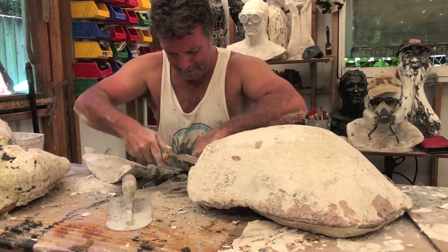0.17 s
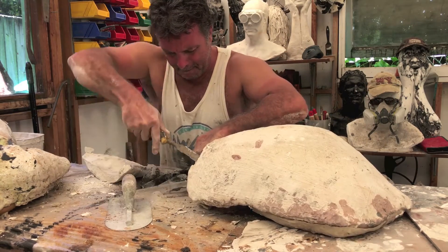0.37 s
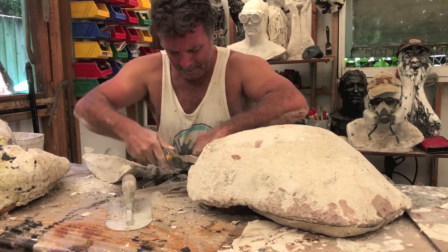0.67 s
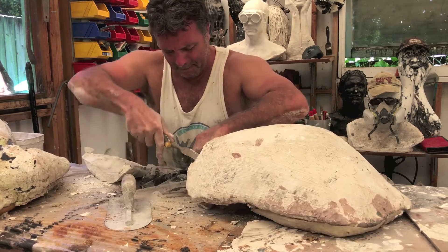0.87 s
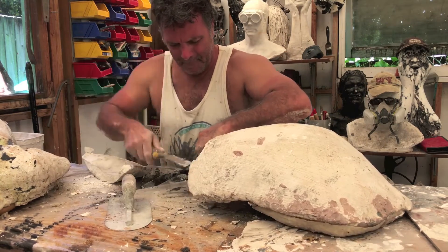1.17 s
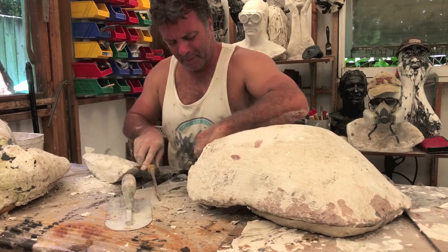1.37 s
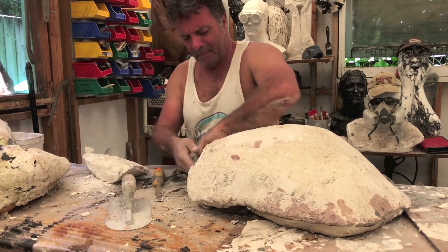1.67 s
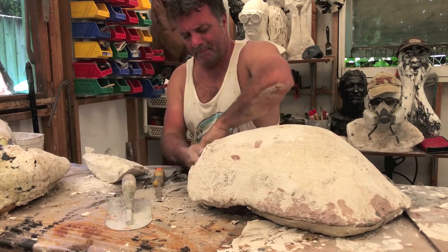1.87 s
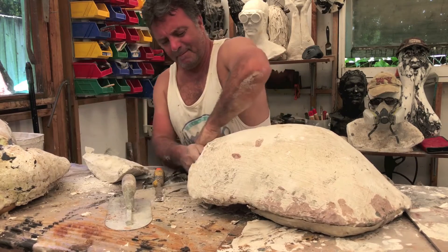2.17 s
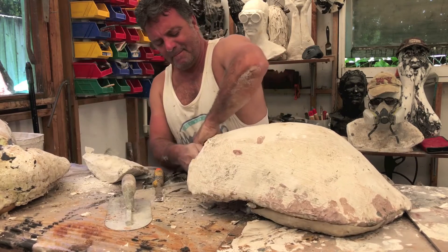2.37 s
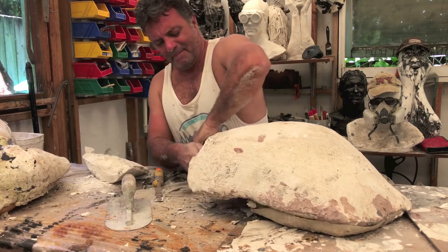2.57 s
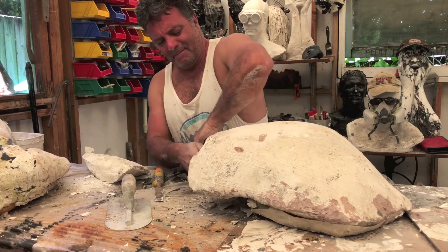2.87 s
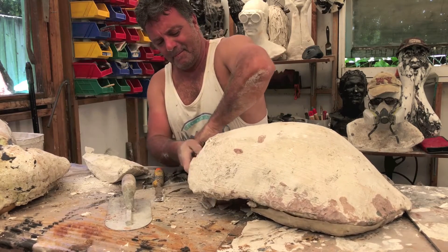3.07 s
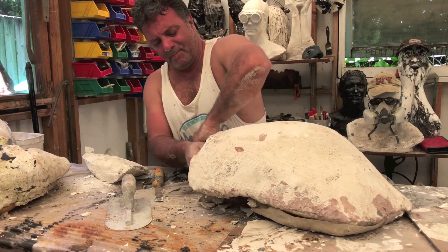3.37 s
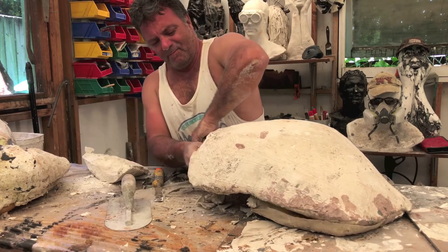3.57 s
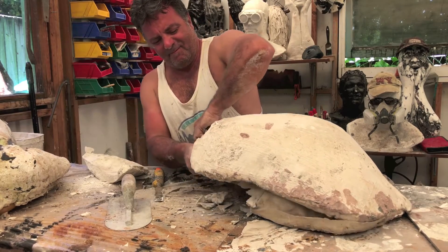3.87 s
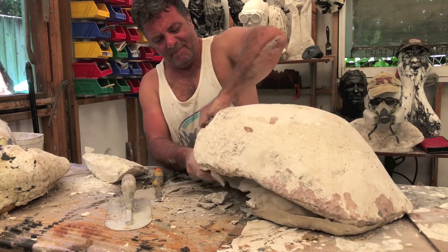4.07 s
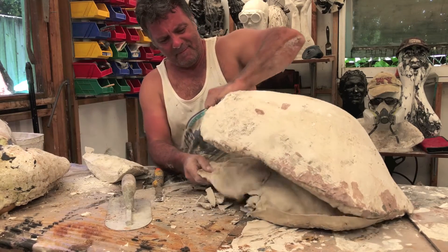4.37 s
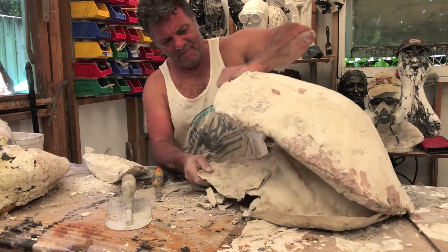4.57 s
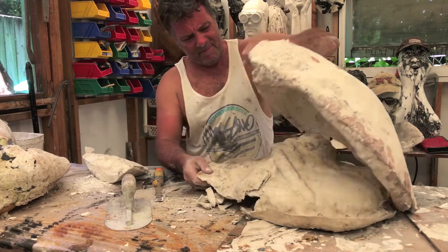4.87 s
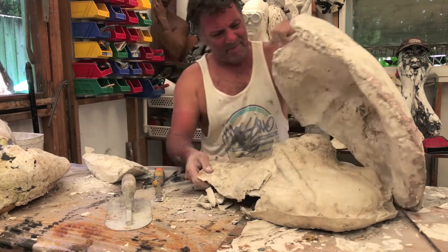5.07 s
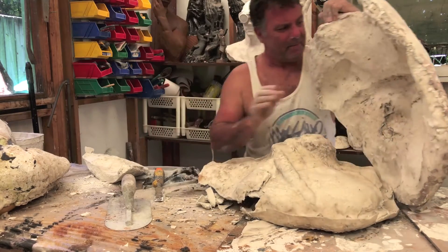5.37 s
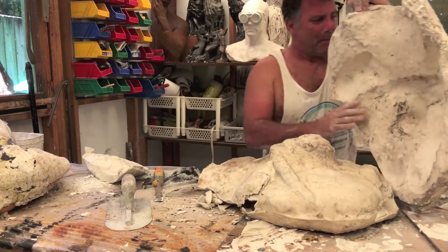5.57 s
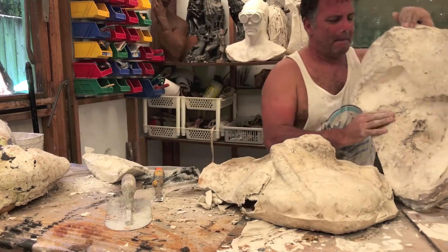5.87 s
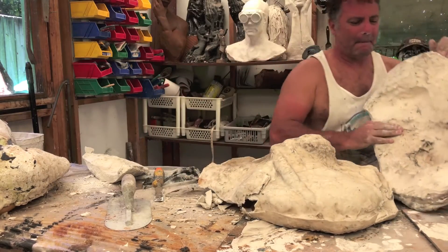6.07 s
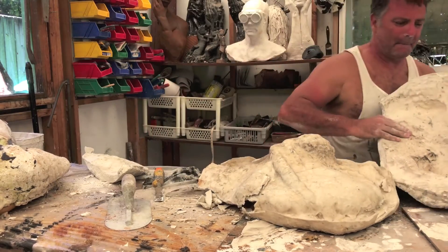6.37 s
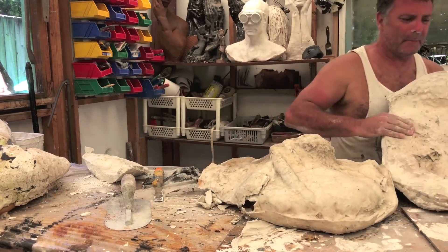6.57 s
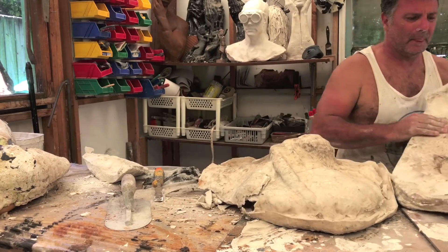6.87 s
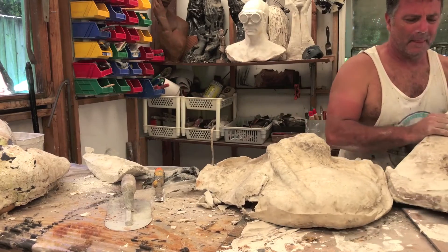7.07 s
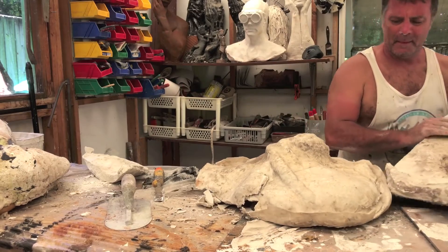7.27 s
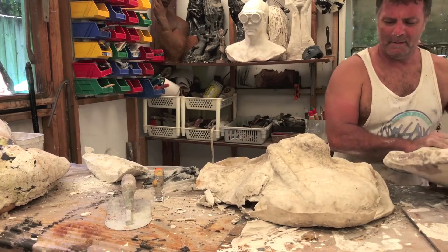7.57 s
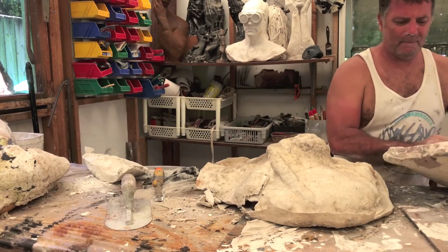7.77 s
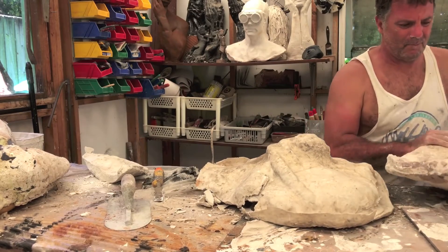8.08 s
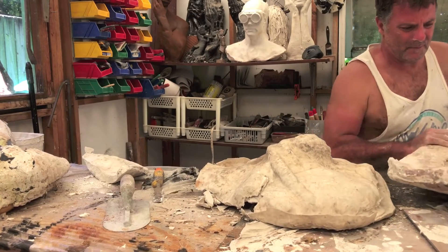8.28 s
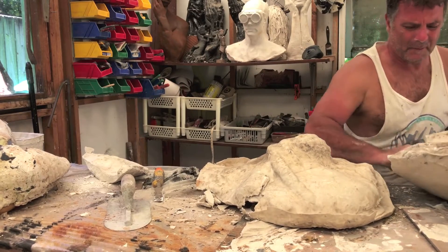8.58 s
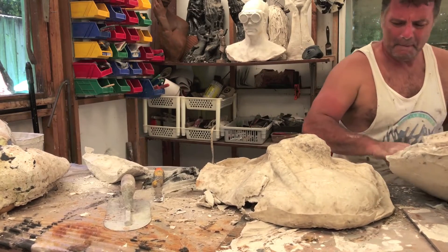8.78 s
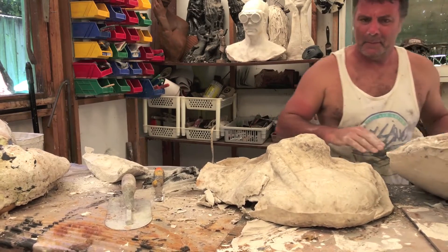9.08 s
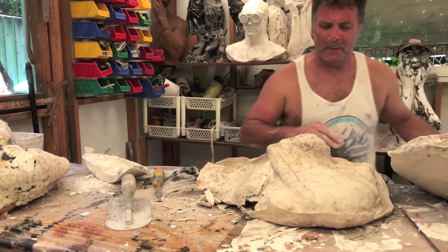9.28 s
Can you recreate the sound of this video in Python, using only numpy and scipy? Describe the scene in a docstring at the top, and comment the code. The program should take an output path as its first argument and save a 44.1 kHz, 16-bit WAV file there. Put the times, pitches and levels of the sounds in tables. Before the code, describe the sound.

A steel blade clicks and scrapes in a plaster mould's seam, a tool thumps down, then the hollow shell cracks free, creaks, knocks and drags.

```python
"""Prising open a plaster mould

A steel blade scrapes and clicks in the seam of a big plaster mould on a wooden bench, in a small studio.
A tool is put down, the seam cracks and the upper shell peels off its rubber lining with a creak.
The shell is then stood on its edge, knocked and dragged over the gritty bench while crumbs fall.
Blows are damped noise bursts, filtered clicks and ringing modes; rubbing is random grains through resonances.
Faint squeals are gliding sines, the creak is a train of slips, and diffuse noise tails give the echo."""
import sys
import numpy as np
from scipy import signal
from scipy.fft import rfft, irfft, next_fast_len
from scipy.io import wavfile
from scipy.ndimage import map_coordinates

SR = 44100
rng = np.random.default_rng(int(sys.argv[2]) if len(sys.argv) > 2 else 0)


def pcm_store(signal):
    """Save signal as 16-bit PCM."""
    levels = np.round(np.clip(np.atleast_2d(signal), -1, 1) * 32767)
    wavfile.write(sys.argv[1], SR, levels.astype(np.int16).T)


N = 416304
T = np.arange(SR // 2) / SR  # time axis of one blow (s)

# Event and mode levels below are in dB before the trims inside each function.

# Colour of the room's hush. Each row: frequency in Hz, spectral level in dB.
AIR_COLOUR = [(20, -19), (41, -11), (62, 2.5), (80, -8), (105, -6.5), (130, -14), (160, -7.5), (210, -12),
              (450, -16.5), (700, -17), (1150, -14), (2400, -17.5), (4940, -28), (11800, -36.5),
              (16000, -38)]
# Decay of the studio's echo. Each row: frequency in Hz, time to fall 60 dB in seconds.
STUDIO_DECAY = [(100, 0.69), (400, 0.36), (1500, 0.25), (5000, 0.24), (15000, 0.15)]
# Plaster crumbs snapping and landing.
# Each row: start in seconds, ring level in dB, pitch in Hz, ring time (60 dB) in seconds, snap level in dB.
CRUMBS = [(1.519, -35, 3100, 0.0075, -55), (1.557, -41, 5230, 0.0018, -48), (1.749, -27, 5660, 0.0046, -54),
          (1.778, -38, 12400, .0036, -44), (2.314, -33, 3730, 0.0066, -59), (2.434, -63, 7400, 0.3, -68),
          (2.6, -43, 5600, 0.0061, -38.5), (2.722, -42, 3800, 0.14, -47), (4.152, -48, 11500, .005, -57),
          (4.16, -41, 11800, .005, -51), (4.221, -43, 5800, .005, -57), (4.24, -48, 4500, .006, -64),
          (4.319, -44, 4090, 0.018, -59), (4.382, -42, 3950, .02, -63), (5.738, -38, 4060, 0.014, -61),
          (6.19, -42, 1340, .015, -65), (6.219, -38, 1900, 0.022, -59), (6.525, -35, 3150, 0.0092, -54),
          (6.761, -37, 4250, 0.014, -52), (6.79, -30, 6640, 0.0049, -50), (6.865, -42, 2660, 0.01, -63),
          (6.982, -31.5, 4060, .013, -53), (6.995, -22, 15030, 0.0045, -36),
          (7.19, -34.5, 2510, 0.018, -62), (7.213, -32.5, 2420, 0.014, -52.5), (7.36, -48, 3870, .027, -55),
          (7.529, -54, 5970, 0.016, -66), (7.58, -43, 4000, 0.011, -60), (7.626, -23, 14950, 0.009, -45),
          (7.755, -41, 9100, .025, -51), (8.32, -39.5, 3400, 0.0058, -54)]
# Modes of a chip. Each row: multiple of its pitch, level in dB.
CHIP_MODES = [(.93, -10), (1, 13.5), (1.12, 5), (1.46, 1.5), (2.07, -8), (2.45, -5)]
# Faint thin squeals, perhaps birds outside; the one near 6.8 s is perhaps a plaster squeak.
# Each row: start in seconds, length in seconds, first pitch in Hz, last pitch in Hz, level in dB,
# roughness as a share of pitch.
SQUEALS = [(3.865, 0.055, 5500, 5770, -48, 0.016), (3.909, 0.12, 5790, 6240, -46, 0.025),
           (3.93, 0.074, 3170, 3300, -50, 0.018), (3.99, 0.085, 4020, 4060, -47, 0.01),
           (4.143, 0.023, 1730, 1784, -35, 0.016), (5.174, 0.019, 3680, 3660, -44, .012),
           (5.19, 0.063, 5600, 5750, -52, 0.024), (5.206, .07, 6600, 6900, -58, .02),
           (5.225, .04, 3400, 3480, -49, 0.023), (5.242, 0.03, 3700, 3800, -41, 0.013),
           (5.286, 0.019, 3940, 3750, -42, 0.017), (5.318, 0.026, 3800, 4020, -43.5, .018),
           (5.294, .012, 3100, 3160, -40, .009), (5.333, .012, 3140, 3120, -41, .009),
           (5.286, 0.058, 6160, 6220, -46, 0.0072), (5.347, 0.057, 6530, 6330, -53, .02),
           (6.787, 0.12, 4830, 5140, -45, 0.0036), (6.825, 0.067, 7700, 7550, -52, .006),
           (7.295, 0.063, 3880, 3810, -53, 0.0044)]
# The blade springing free and rattling. Each row: start in seconds, level in dB.
PINGS = [(0.958, -42), (2.583, -30.5), (3.1675, -44), (3.288, -42.5), (3.292, -52), (3.355, -47),
         (4.267, -56), (4.32, -48.5)]
# Ringing modes of the steel blade. Each row: frequency in Hz, level in dB, ring time (60 dB) in seconds.
BLADE_MODES = [(5600, 4.5, 0.09), (6720, 9, 0.031), (8700, 11, 0.051), (10100, 3.5, 0.04),
               (11150, -30, 0.027), (11800, -1, .06), (12600, -8, .06), (14100, -12, .1)]
# Tools put down on the bench top.
# Each row: start in seconds, boom, thud, clack, crack and grit levels in dB, seconds until the top is muted.
BUMPS = [(1.461, -9, -26, -32, -51, -42, .125), (1.659, -11, -23, -34, -34, -43, .145),
         (1.664, -32, -27, -27, -19.5, -49, .02), (1.729, -48, -48, -52, -41, -62, .02),
         (1.757, -22, -38, -50, -51, -62, .04)]
# Ringing modes of the bench top. Each row: frequency in Hz, level in dB, ring time (60 dB) in seconds.
BENCH_MODES = [(80, -14, .28), (112, -19, .25), (165, -10, .2), (177, -2, .55), (199, -5, .38),
               (216, -9, .2), (255, -15, .3), (305, -16, .3), (406, -12, .25), (520, -2, .25),
               (657, -4, .32), (850, -9, .2)]
# The heavy mould shifting and settling as the seam lets go.
# Each row: start in seconds, thud, clack, crack and grit levels in dB.
SETTLES = [(3.17, -14.5, -26, -30.5, -30.5), (3.189, -33, -29.5, -31.5, -40), (3.216, -32, -47, -55, -60),
           (3.279, -26, -51, -44, -46), (3.298, -27, -41.5, -45, -45), (3.338, -43, -66, -56, -62),
           (3.414, -35, -57, -50, -54), (3.433, -45, -56, -56, -60), (4.267, -29.5, -51, -59, -48),
           (4.362, -38, -55, -68, -52), (5.092, -26.5, -58, -28.5, -60), (5.741, -39, -65, -50, -53)]
# Modes of the lower half lying on the bench. Each row: frequency in Hz, level in dB, ring time (60 dB) in seconds.
BASE_MODES = [(172, 2, .11), (205, 5, .09), (272, 2, .14), (400, -5, .14), (538, -1, .16), (700, -1, .14),
              (845, 4, .1), (1270, -10, .14)]
# The rubber lining creaking just before the shell comes free.
# Each row: time in seconds, slips per second, level in dB.
CREAK = [(4.422, 153, -40), (4.432, 206, -34), (4.441, 216, -37), (4.447, 257, -26), (4.475, 259, -31.5),
         (4.51, 240, -43.5)]
# Modes of the rubber-lined cavity. Each row: frequency in Hz, level in dB, ring time (60 dB) in seconds.
LINING_MODES = [(553, -11, 0.14), (786, -10, .12), (1040, 1.5, .12), (1170, -1.5, .1), (1400, -6, .04),
                (1547, 0, .06), (1797, 2, 0.11), (1930, -3, 0.074), (2380, -9, .06), (2510, -6, .08),
                (2910, -5, 0.12), (3100, -6, 0.055), (3440, -7, .06), (3800, -7, .03), (4250, -11, .03)]
# Strokes of blade and rubber along the seam.
# Each row: start in seconds, length in seconds, rasp, rumble and grit levels in dB.
SEAM_STROKES = [(0.19, 0.015, -48, -73, -72), (0.69, 0.013, -41, -44.5, -43),
                (0.803, 0.022, -42.5, -52, -52), (0.835, 0.13, -45.5, -58, -58),
                (1.07, 0.16, -58, -69, -55), (1.255, 0.029, -40.5, -60, -47),
                (1.958, 0.037, -43.5, -65, -53), (2.02, 0.25, -55, -60.5, -52), (3.8, 0.017, -45, -57, -57),
                (3.846, 0.02, -45, -71, -50), (4.085, 0.038, -48.5, -41, -52),
                (4.135, 0.03, -44.5, -62, -51.5), (4.205, 0.025, -51.5, -48, -45.5),
                (4.425, 0.031, -50, -50.5, -44), (4.54, 0.028, -60, -53, -67), (4.62, 0.061, -48, -69, -53)]
# Colour of the seam's rub. Each row: frequency in Hz, spectral level in dB.
SEAM_COLOUR = [(29, -33), (50, -26), (264, -19.5), (461, -21), (532, -13.5), (711, -12.5), (1020, -16),
               (1300, -0.5), (1780, -1), (2210, -7), (2950, -14.5), (5020, -30), (11700, -47.5),
               (16000, -49)]
# Blade levering in the seam, plaster giving way.
# Each row: start in seconds, clack, thud, crack and grit levels in dB.
PRISES = [(0.023, -25.5, -29.5, -41, -39), (0.396, -21.5, -31.5, -37.5, -35.5), (0.567, -36, -78, -56, -35),
          (0.587, -31.5, -39.5, -52, -59), (0.69, -58, -58, -48, -66), (0.936, -29, -60, -52, -59),
          (1.006, -24.5, -42, -41.5, -45), (1.273, -43, -49, -45.5, -52), (1.622, -40.5, -37.5, -44, -43),
          (2.313, -35.5, -65, -54, -57), (2.431, -42.5, -49, -50, -61), (2.584, -29, -34.5, -51, -31),
          (2.682, -26.5, -35.5, -58, -44), (2.711, -29, -40, -43, -41), (3.853, -56, -52, -48.5, -44),
          (4.318, -41, -37.5, -65, -43), (4.381, -41, -63, -55, -39), (4.521, -15.5, -30, -28.5, -25.5),
          (4.527, -31, -28.5, -43, -49), (4.582, -28.5, -59, -52, -36), (4.595, -26, -46, -28.5, -27),
          (4.601, -32, -48, -51, -47), (4.654, -37, -40, -45, -40), (4.722, -36, -74, -57, -43),
          (5.09, -30.5, -54, -54, -42), (5.122, -27, -35.5, -47, -48), (5.14, -35, -45, -50, -54)]
# Modes of the closed mould. Each row: frequency in Hz, level in dB, ring time (60 dB) in seconds.
MOULD_MODES = [(268, 4, 0.11), (301.5, -14.5, 0.19), (538, -8.5, 0.18), (872, 4.5, .07),
               (1051, 14.5, 0.056), (1300, -3, 0.25), (1427, 2, 0.095), (2080, -22, 0.11)]
# Modes of the freed shell above its hollow note.
# Each row: frequency in Hz, level in dB, ring time (60 dB) in seconds.
SHELL_MODES = [(416.6, -1, 0.25), (513, -15, 0.27), (567, -8, 0.21), (645, 4.5, 0.15), (850, -3, 0.28),
               (1027, 5, 0.19), (1156, 6, 0.15), (1444, -11, 0.024), (1603, -3, 0.12), (1800, -9.5, 0.29),
               (2380, -3, 0.032)]
# The shell rocking over on its rim. Each row: start in seconds, length in seconds, rumble level in dB.
ROCKS = [(7.097, 0.055, -50), (7.297, 0.14, -43.5), (7.483, 0.1, -48)]
# Pushes that slide the shell's rim over the bench.
# Each row: start in seconds, length in seconds, rasp, rumble and grit levels in dB.
SLIDES = [(5.837, 0.055, -46.5, -81, -54), (5.99, 0.094, -51, -77, -52), (6.122, 0.053, -42.5, -54, -46.5),
          (6.213, 0.021, -40.5, -69, -46.5), (6.356, 0.049, -44, -33.5, -52), (6.569, 0.017, -48, -62, -46),
          (6.672, 0.014, -39.5, -37.5, -50), (6.692, 0.069, -36, -36.5, -47.5),
          (6.772, 0.16, -61, -39, -51), (6.925, 0.18, -40.5, -52, -43.5), (7.117, 0.1, -42, -43, -49.5),
          (7.253, 0.17, -47.5, -54.5, -55), (7.485, 0.046, -47, -42.5, -69),
          (7.538, 0.081, -45, -55, -57.5), (8.425, 0.054, -42.5, -51, -58),
          (8.476, 0.15, -33.5, -35, -46.5), (8.6, 0.036, -54, -48, -50), (8.655, 0.076, -42, -46.5, -51),
          (8.725, 0.12, -56, -51.5, -68), (8.969, 0.014, -52.5, -53, -71), (9.266, 0.11, -57, -70, -61),
          (9.363, 0.028, -48, -52, -45)]
# Colour of the rim's rub with the shell on edge. Each row: frequency in Hz, spectral level in dB.
EDGE_COLOUR = [(55, -2), (80, 2), (115, -3), (165, -2), (270, -7), (400, -1.5), (560, -6), (800, 0),
               (1050, -0.5), (1200, -4), (1600, 3), (2300, -1), (3800, -4), (7000, -22), (16000, -34)]
# Colour of the rim's rub with the shell on its back. Each row: frequency in Hz, spectral level in dB.
BACK_COLOUR = [(55, -5), (80, 1), (115, -20), (165, 4.5), (210, -4), (270, -8), (350, -5.5), (480, -2),
               (950, -4.5), (1800, -6), (3800, -10), (7000, -24), (16000, -37)]
# The freed shell striking the bench; where it lands sets its hollow note.
# Each row: start in seconds, clack, thud, crack and grit levels in dB, note in Hz.
KNOCKS = [(6.32, -33, -29, -42, -31.5, 395), (6.325, -43, -31, -36, -46, 344),
          (6.343, -26, -26.5, -25, -28.5, 265), (6.462, -23.5, -17, -30, -36, 238),
          (6.473, -22.5, -21.5, -55, -55, 268), (6.712, -29.5, -24, -53, -55, 264),
          (6.734, -37, -25.5, -40, -44, 265), (6.746, -29.5, -32, -47, -52, 269),
          (6.771, -37, -35, -53, -48, 273), (6.865, -37, -55, -42, -52, 265),
          (6.892, -21, -25, -24.5, -25.5, 265), (7.036, -27, -17, -23.5, -18, 353),
          (7.047, -19, -16, -44, -41, 360), (7.115, -30.5, -38, -36, -31.5, 338),
          (7.214, -39, -37.5, -39.5, -32.5, 345), (7.492, -47, -29.5, -52, -55, 261),
          (7.546, -46, -35, -53, -58, 336), (7.654, -29, -40, -30.5, -35, 341),
          (7.664, -46, -39, -35.5, -30.5, 350), (7.756, -46.5, -57, -40, -47, 342),
          (8.184, -41, -41, -42.5, -35, 337), (8.625, -47, -39, -39, -48, 313),
          (8.795, -60, -48, -65, -67, 198), (9.0, -55, -47, -62, -64, 280),
          (9.372, -34, -60, -62, -56, 353)]

TOP_HZ = 16100  # upper limit of the sound
AIR_DB = -52  # level of the studio's hush
DUST_PER_S, DUST_DB, DUST_SPREAD_DB = 20, -71, 2  # specks: middling rate, level, scatter of size (+/-)
CHIP_SIDE_T60 = .025  # longest ring of a chip's side modes (s)
SQUEAL_RELEASE_S = .005  # time constant of a squeal breaking off
SWING_HZ, SWING_S, MUTED_T60 = 178, .023, .11  # bench top's first swings, their length; ring time under a hand (s)
PEEL_STEP_S, PEEL_SHIFT = .014, .018  # the loose edge moves on this often; typical detuning of the lining (share)
FREE_AT = 4.5  # the upper shell comes loose (s)
LAID_AT = 7.0  # the shell tips onto its back (s)
UPRIGHT_HZ, LYING_HZ = 265, 332.6  # the shell's hollow note on its edge and on its back
NOTE_DB, NOTE_T60 = 10, 0.13  # relative strength and ring time (s) of that note
RING_ON_EDGE, RING_ON_BACK = 1.3, .7  # how freely the dragged shell rings; the bench damps it when it lies flat
DRAG_GRAINS_PER_S = 1100  # grains crushed under the sliding rim
GRAIN_SPREAD_DB, SMOOTH_SHARE = 2.2, .55  # scatter of grain size; fine powder against the grains
STROKE_ATTACK_SHARE = 0.36  # least part of a stroke spent getting up to speed
LONG_PUSH_S = 0.7  # the nearer a push comes to this length, the more of it is run-up
STROKE_RELEASE_S = 0.016  # time constant of coming to rest


def amp(db):
    """Decibels to gain."""
    return 10 ** (np.asarray(db) / 20)


def unit(x):
    """Scaled to rms 1."""
    return x / np.sqrt(np.mean(x ** 2) + 1e-20)


def pulse(x):
    """Scaled to the energy of 10 ms at rms 1."""
    return x * np.sqrt(SR / 100 / np.sum(x ** 2))


def along(points, hz):
    """(Hz, value) points read on a log frequency axis."""
    f, v = np.transpose(points)
    return np.interp(np.log(hz + 1), np.log(f + 1), v)


def curves(rows):
    """One value per sample for each column after the time."""
    s, *cols = np.transpose(rows)
    return [np.interp(np.arange(N) / SR, s, c) for c in cols]


def during(rows, fade=0.024):
    """1 while a curve lasts, with soft ends."""
    first, last = rows[0][0], rows[-1][0]
    return np.interp(np.arange(N) / SR, [first - fade, first, last, last + fade], [0, 1, 1, 0])


def wobble(rate, size=N):
    """A smooth random curve with rate knots a second."""
    knots = rng.standard_normal(int(size * rate / SR) + 4)
    return map_coordinates(knots, [np.arange(size) * rate / SR])


def filtered(x, response):
    """x shaped by a response of frequency."""
    m = next_fast_len(N + SR // 2)
    return irfft(rfft(x, m) * response(np.fft.rfftfreq(m, 1 / SR)), m)[:N]


def band(x, lo_hz, hi_hz):
    """Causal band-pass."""
    edges = [lo_hz, min(hi_hz, .48 * SR)]
    return signal.sosfilt(signal.butter(3, edges, "band", fs=SR, output="sos"), x)


def add(track, s, sound):
    """Mix a sound into the track at time s."""
    start = max(round(s * SR), 0)
    track[start:start + len(sound)] += sound[:N - start]


def burst(lo_hz, hi_hz, t60, rise=0.00036):
    """A blow on many close, well damped modes; a crushing contact takes a moment to build."""
    noise = rng.standard_normal(len(T)) * amp(-60 * T / t60) * (1 - np.exp(-T / rise))
    return pulse(band(noise, lo_hz, hi_hz))


def click(lo_hz, hi_hz):
    """The first, clean edge of a brittle contact."""
    return pulse(band(signal.unit_impulse(len(T)), lo_hz, hi_hz))


def ring(modes, low_db, high_db, rise=0.0079, split_hz=450):
    """Modes at new strengths: the weight of a blow drives the low ones, its hardness the high ones."""
    out = np.zeros(len(T))
    for hz, db, t60 in modes:
        drive_db = low_db if hz < split_hz else high_db
        envelope = amp(drive_db + db + rng.normal(0, 2.3) - 60 * T / t60)
        out += envelope * np.sin(2 * np.pi * hz * (1 + rng.normal(0, 0.005)) * T)
    return out * (1 - np.exp(-T / rise))


def studio(x, wet_db, gap=0.00075):
    """The sound with a fresh diffuse echo that starts after the first bounce off the bench."""
    hz, t, z = signal.stft(rng.standard_normal(len(T)), SR, nperseg=256)
    decay = amp(-60 * t / along(STUDIO_DECAY, hz)[:, None])
    tail = signal.istft(z * decay, SR, nperseg=256)[1][:len(T)]
    tail = tail * np.clip(T / gap - .5, 0, 1)
    echo = signal.fftconvolve(x, tail / np.linalg.norm(tail))[:len(x)]
    return x + amp(wet_db) * echo


def stroke(start, length):
    """Speed of one hand movement: it swells, holds and dies away; long pushes start more gently."""
    t = np.arange(N) / SR - start
    attack = length * (STROKE_ATTACK_SHARE + length / LONG_PUSH_S)
    swell = np.sin(np.pi / 2 * np.clip(t / attack, 0, 1)) ** 0.56
    return swell * np.exp(-np.clip((t - length) / STROKE_RELEASE_S, 0, 20))


def friction(strokes, colour, modes, grain_rate, judder_db, ring_share, crackle_rate, crackle_db):
    """Grains catch and break under a stroke; they shake the bench, the plaster's modes and the loose grit."""
    caught = rng.random(N) < grain_rate / SR
    grains = caught * rng.standard_normal(N) * amp(GRAIN_SPREAD_DB * rng.standard_normal(N))

    def response(f):
        """The rub's colour, lifted around each mode."""
        resonance = sum(amp(db) / (1 + 1j * (f - hz) * t60 / 2) for hz, db, t60 in modes)
        return amp(along(colour, f)) * (1 + ring_share * resonance)

    rub = filtered(unit(grains) + SMOOTH_SHARE * rng.standard_normal(N), response)
    rumble = unit(band(rub, 52, 465))
    rasp = unit(band(rub, 696, 3850))
    grit = unit(band(rub, 5780, 17000))
    # a few larger grains snap singly
    coarse = (rng.random(N) < crackle_rate / SR) * rng.standard_normal(N)
    grit = unit(grit + amp(crackle_db) * unit(band(coarse, 2300, 4100)))
    out = np.zeros(N)
    for start, length, rasp_db, rumble_db, grit_db in strokes:
        layers = amp(rumble_db) * rumble + amp(rasp_db) * rasp + amp(grit_db) * grit
        out += stroke(start, length) * layers
    return studio(out * amp(judder_db * wobble(70) - 5.0), wet_db=-3.5)


def shell(note_hz):
    """All the modes of the freed shell, from its hollow note up."""
    return [(note_hz, NOTE_DB, NOTE_T60)] + SHELL_MODES


def air():
    """The steady hush of the studio: coloured noise with a barely moving level."""
    hush = unit(filtered(rng.standard_normal(N), lambda f: amp(along(AIR_COLOUR, f))))
    return hush * amp(AIR_DB + 0.22 * wobble(12.0))


def dust():
    """Specks of plaster tick faintly on the bench, in loose flurries."""
    lands = rng.random(N) < DUST_PER_S / SR * amp(5 * wobble(2))
    specks = lands * amp(DUST_SPREAD_DB * rng.uniform(-1, 1, N))
    return amp(DUST_DB) * unit(studio(band(specks, 1600, 8500), wet_db=-7.0))


def squeals():
    """Each squeal is a short wavering whistle that glides, flutters and breaks off."""
    out = np.zeros(N)
    for start, length, first_hz, last_hz, db, rough in SQUEALS:
        glide_hz = np.interp(T, [0, length], [first_hz, last_hz])
        waver = 1.6 * wobble(1500, size=len(T)) + wobble(120, size=len(T))
        phase = 2 * np.pi * np.cumsum(glide_hz * (1 + rough * waver)) / SR
        swell = np.sqrt(np.clip(2 * T / length, 0, 1))
        release = np.exp(-np.maximum(T - length, 0) / SQUEAL_RELEASE_S)
        add(out, start, amp(db) * swell * release * np.sin(phase))
    return studio(out * amp(4.5 * wobble(130) - 8), wet_db=-2)


def crumbs():
    """Small chips snap, each ringing like a tiny plate whose side modes die early."""
    out = np.zeros(N)
    for s, db, hz, t60, snap_db in CRUMBS:
        modes = [(hz * k, level, t60 if k == 1 else min(t60, CHIP_SIDE_T60))
                 for k, level in CHIP_MODES if hz * k < SR / 2]
        tick = amp(db - 5.5) * ring(modes, 0, 0, rise=0.00051)
        snap = amp(snap_db) * burst(1500, 14500, t60=0.0078)
        add(out, s, studio(tick, wet_db=-9.0) + studio(snap, wet_db=-4))
    return out


def blade():
    """The thin steel pings on its high modes when it slips off the plaster."""
    out = np.zeros(N)
    for s, db in PINGS:
        ping = amp(db - 11.0) * ring(BLADE_MODES, 0, 0, rise=0.00025)
        add(out, s, studio(ping, wet_db=-14))
    return out


def bumping():
    """Tools meet the bench, whose top swings deeply and rings until a hand's weight mutes it."""
    out = np.zeros(N)
    for s, boom_db, thud_db, clack_db, crack_db, grit_db, free_s in BUMPS:
        body = amp(boom_db - 18.5) * click(187, 560)
        body += amp(thud_db) * burst(247, 553, t60=0.08)
        body += amp(clack_db) * burst(580, 990, t60=0.12)
        snap = amp(crack_db) * burst(970, 2090, t60=0.038)
        snap += amp(crack_db - 8.0) * burst(920, 4000, t60=0.019)
        grit = amp(grit_db) * click(3800, 13000)
        weight = amp(boom_db - 16.5) * click(56, 120)  # the frame takes the load
        swing = np.sin(np.pi * np.clip(T / SWING_S, 0, 1)) * np.sin(2 * np.pi * SWING_HZ * T)
        push = amp(boom_db - 10) * swing
        muting = amp(-60 * np.maximum(T - free_s, 0) / MUTED_T60)
        top = muting * ring(BENCH_MODES, boom_db - 10.5, clack_db - 9, rise=0.0035)
        add(out, s, studio(body + snap + grit, wet_db=-5.5) + push + weight + studio(top, wet_db=-15))
    return out


def settling():
    """The lower half drops a little on its rubber lining: dull, quickly damped thuds."""
    out = np.zeros(N)
    for s, thud_db, clack_db, crack_db, grit_db in SETTLES:
        body = amp(thud_db - 12) * burst(164, 365, t60=0.19, rise=0.0012)
        body += amp(clack_db - 2) * burst(390, 990, t60=0.032)
        snap = amp(crack_db - 7.0) * burst(1240, 3400, t60=0.018)
        snap += amp(grit_db - 5.5) * burst(1600, 14600, t60=0.0047)
        base = ring(BASE_MODES, thud_db - 6.5, clack_db - 3, rise=0.006)
        add(out, s, studio(body, wet_db=-6.5) + studio(snap, wet_db=-4.5) + base)
    return out


def creak():
    """Rubber lets go in quick uneven slips; as the loose edge travels, each stretch rings the lining differently."""
    rate, db = curves(CREAK)
    count = np.floor(np.cumsum(rate * amp(1.9 * wobble(300))) / SR)
    slips = np.diff(count, prepend=0) * amp(3.5 * rng.standard_normal(N))
    tone = np.zeros(N)
    for s in np.arange(CREAK[0][0] - PEEL_STEP_S, CREAK[-1][0] + PEEL_STEP_S, PEEL_STEP_S):
        modes = [(hz * (1 + PEEL_SHIFT * rng.standard_normal()), level, t60)
                 for hz, level, t60 in LINING_MODES]
        answer = pulse(ring(modes, 0, 0, rise=0.00047)) + amp(-20) * burst(840, 4300, t60=0.012)
        stretch = slips[round(s * SR):round((s + PEEL_STEP_S) * SR)]
        add(tone, s, signal.fftconvolve(stretch, answer))
    gate = during(CREAK, fade=0.008)
    return studio(gate * amp(db - 4.5) * tone / np.std(tone[gate > .5]), wet_db=-16)


def scraping():
    """Blade and rubber rub along the seam, exciting the closed mould's modes."""
    return friction(SEAM_STROKES, SEAM_COLOUR, MOULD_MODES, grain_rate=2100, judder_db=2.5,
                    ring_share=1.7, crackle_rate=160, crackle_db=-1.0)


def prising():
    """Each slip of the blade snaps the brittle seam and rings the mould; once loose, the shell rings alone."""
    out = np.zeros(N)
    for s, clack_db, thud_db, crack_db, grit_db in PRISES:
        body = amp(thud_db - 9.5) * burst(162, 436, t60=0.046)
        body += amp(clack_db - 11.5) * burst(575, 1670, t60=0.067, rise=0.00025)
        if s < FREE_AT:
            modes = ring(MOULD_MODES, thud_db, clack_db - 13.5, rise=0.0093)
        else:
            modes = ring(shell(LYING_HZ), thud_db - 18, clack_db - 42, rise=0.002)
        snap = amp(crack_db) * burst(1700, 4160, t60=0.019, rise=0.00033)
        snap += amp(grit_db - 14.5) * burst(5200, 15000, t60=0.033)
        edge = amp(clack_db - 17.5) * click(720, 2270)
        edge += amp(crack_db - 5.5) * click(2760, 6000)
        edge += amp(grit_db - 16) * click(6600, 13600)
        add(out, s, studio(body, wet_db=-3) + studio(snap, wet_db=-1) + studio(modes, wet_db=-20) + edge)
        # the plaster crunches faintly just before it gives
        add(out, s - .007, amp(crack_db - 7.5) * burst(740, 6100, t60=0.15, rise=0.0039))
    return out


def rocking():
    """The weight of the shell rolling on its rim rumbles through the bench."""
    load = sum(amp(db) * stroke(start, length) for start, length, db in ROCKS)
    return load * unit(band(rng.standard_normal(N), 42, 127))


def dragging():
    """The rim grinds over coarse grit; the shell's note rises and its colour changes once it lies on its back."""
    out = np.zeros(N)
    for on_back, note_hz, colour, freedom in [(False, UPRIGHT_HZ, EDGE_COLOUR, RING_ON_EDGE),
                                              (True, LYING_HZ, BACK_COLOUR, RING_ON_BACK)]:
        pushes = [row for row in SLIDES if (row[0] >= LAID_AT) == on_back]
        out += friction(pushes, colour, shell(note_hz), grain_rate=DRAG_GRAINS_PER_S, judder_db=1.5,
                        ring_share=freedom, crackle_rate=160, crackle_db=-5)
    return out


def knocking():
    """The hollow shell strikes the bench with a stony crack and rings briefly."""
    out = np.zeros(N)
    for s, clack_db, thud_db, crack_db, grit_db, note_hz in KNOCKS:
        body = amp(thud_db - 11.0) * burst(251, 620, t60=0.07, rise=0.0057)
        body += amp(clack_db - 8.0) * burst(724, 1760, t60=0.042, rise=0.0015)
        weight = amp(thud_db - 15.0) * burst(40, 190, t60=0.52, rise=0.0067)  # the bench frame takes the load
        snap = amp(crack_db - 3.0) * burst(1410, 3760, t60=0.019, rise=0.0013)
        snap += amp(grit_db - 19.5) * burst(4800, 15700, t60=0.034)
        # doubled decibels: stone-hard contact stands out on hard blows only
        edge = amp(2 * grit_db + 13.5) * click(4240, 6770)
        hollow = ring(shell(note_hz), thud_db - 13, clack_db - 13, rise=0.0048)
        blow = studio(body, wet_db=-2) + studio(hollow + edge, wet_db=-15) + studio(snap, wet_db=-5.5)
        add(out, s, blow + weight)
        # grit under the rim is crushed first
        add(out, s - .005, amp(crack_db - 8.0) * burst(690, 6360, t60=0.11, rise=0.0046))
    return out


def scene():
    """All the handling over the hush of the room."""
    background = air() + dust() + squeals()
    details = crumbs() + blade()
    bench = bumping() + settling()
    seam = creak() + scraping() + prising()
    freed_shell = rocking() + dragging() + knocking()
    return (background + details + bench + seam + freed_shell)[None]


def record(dry):
    """Thins the deepest bass and cuts steeply above the upper limit."""
    sound = signal.sosfilt(signal.butter(2, 32, "high", fs=SR, output="sos"), dry[0])
    return filtered(sound, lambda hz: 1 / (1 + (hz / TOP_HZ) ** 120))[None]


dry = scene()
out = record(dry)
pcm_store(out)
```